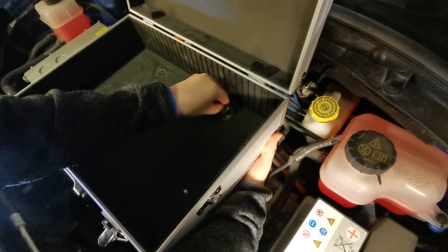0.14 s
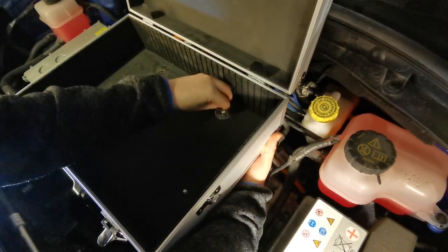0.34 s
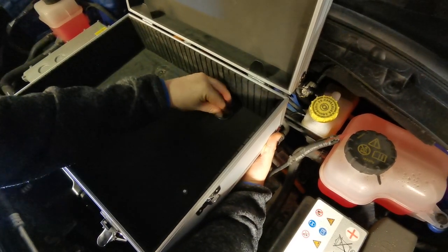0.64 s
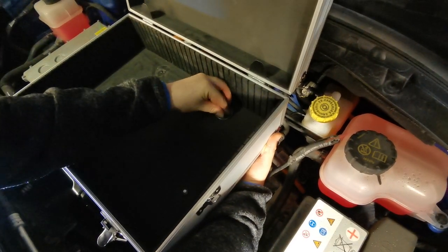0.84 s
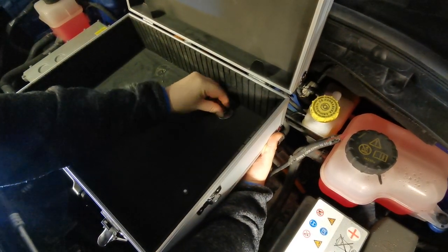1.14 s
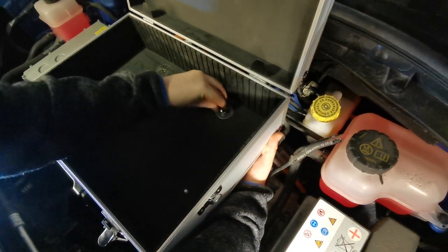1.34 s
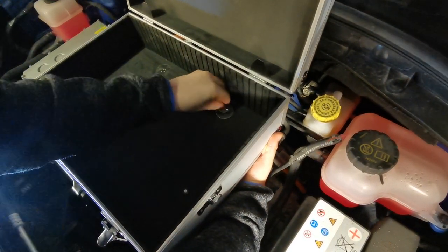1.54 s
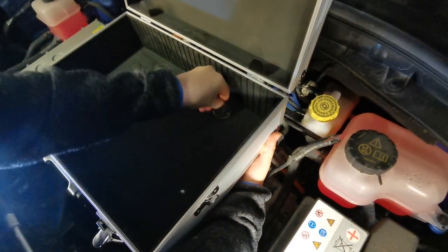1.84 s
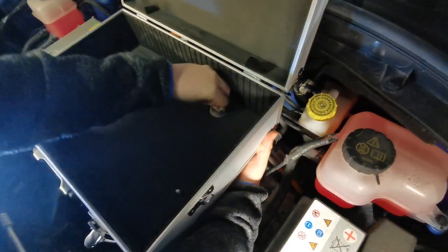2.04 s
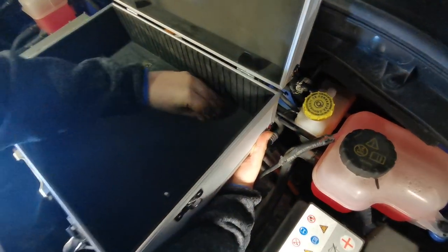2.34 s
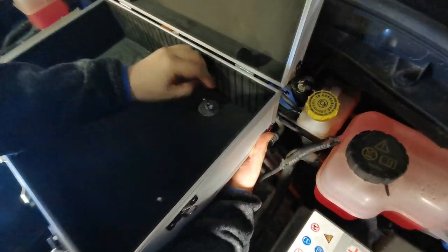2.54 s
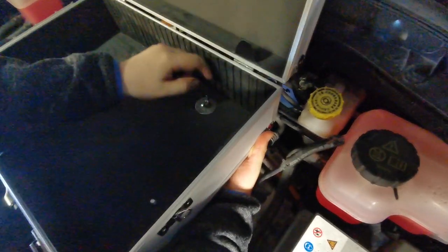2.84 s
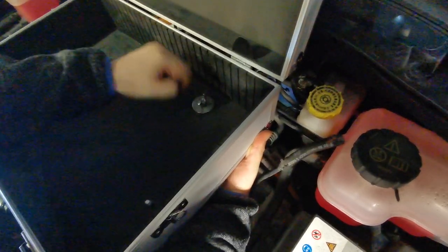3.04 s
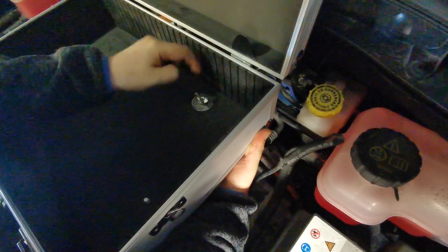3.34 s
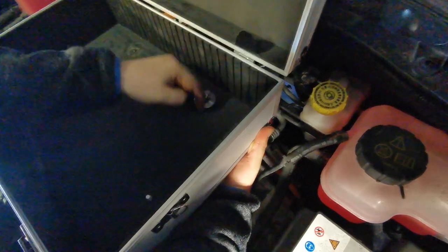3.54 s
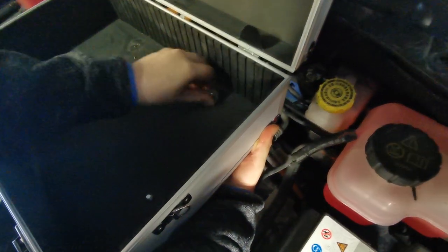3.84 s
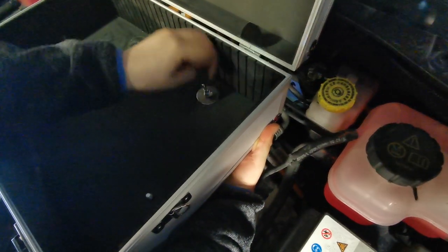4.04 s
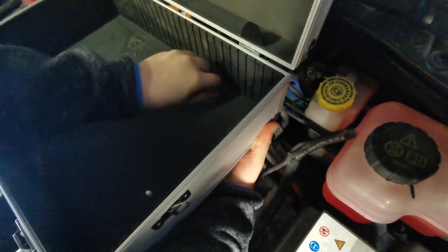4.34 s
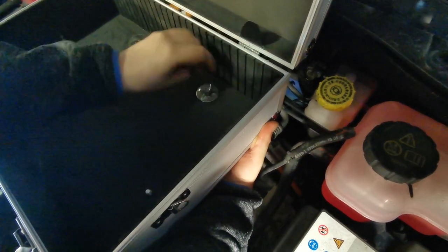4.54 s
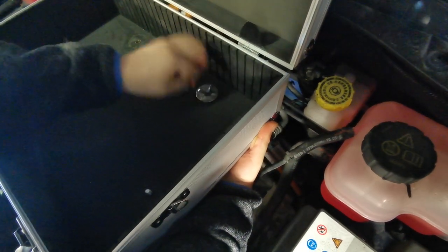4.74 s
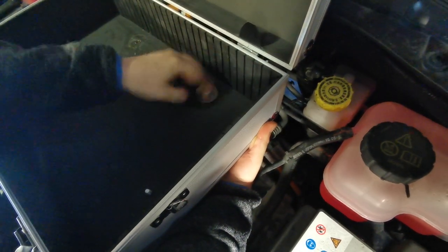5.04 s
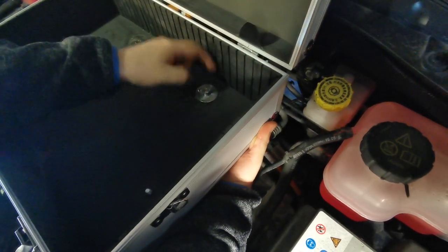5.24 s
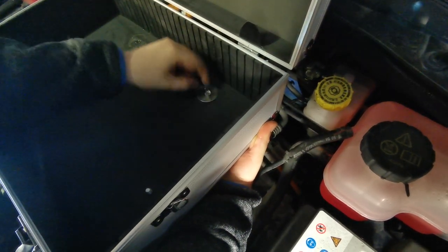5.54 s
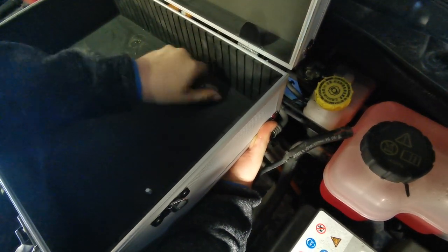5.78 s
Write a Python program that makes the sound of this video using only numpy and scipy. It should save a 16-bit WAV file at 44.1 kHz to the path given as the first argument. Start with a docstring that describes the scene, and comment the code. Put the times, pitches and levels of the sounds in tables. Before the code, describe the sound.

Close, quiet stereo sound of a wing nut being spun by hand onto a loose bolt in a metal-framed case in an engine bay. A clack at 0.0 s and a lighter one at 0.2 s ring briefly, then only faint scraping, a very weak squeak and skin slips remain over a low, wavering hum. The hum sinks around 1.4 s, returns weakly near 1.9 s and fades. A clack with a scrape comes at 1.3 s, and the loudest double clack at 1.8 s. Small ticks follow at 2.4 s, a boomy knock and scrape at 2.8 s, and strong pinging clacks at 3.3-3.4 s. From 3.6 to 4.5 s there are scrapes, grainy finger slips and sleeve rustle. A ringing flick at 4.8 s leads to bright, scraping clacks around 5.2 and 5.4 s, then soft sleeve brushing over low rumble.

```python
"""A wing nut is spun by hand onto a bolt through the floor of a metal-framed case in an engine bay.
The loose bolt clacks in its hole and its thread scrapes: blows and trains of tiny blows on ringing modes.
Fingers knock the case and flick the nut so that it pings; the spinning thread squeaks faintly as a friction
tone, and skin slips over the wings as grainy noise.
A low, wavering sine hums and falls away unevenly over a quiet background of coloured noise."""
import sys
import numpy as np
from scipy import signal
from scipy.fft import rfft, irfft, next_fast_len
from scipy.io import wavfile
from scipy.ndimage import uniform_filter1d

SR = 44100
rng = np.random.default_rng(int(sys.argv[2]) if len(sys.argv) > 2 else 0)


def to_wav(sig):
    """Store sig (one row per channel, or 1-D mono) as 16-bit WAV at the path in sys.argv[1].

    Samples outside -1..1 are clipped; the rate is SR.
    """
    pcm = np.clip(np.atleast_2d(sig), -1, 1) * 32767
    pcm = np.round(pcm).astype(np.int16)
    wavfile.write(sys.argv[1], SR, pcm.T)  # frames by channels


N = 260710
TIME = np.arange(N) / SR
AGE = TIME[:int(0.4 * SR)]   # time since a blow, s
BAND_HZ = np.geomspace(25, 16000, 33)   # centres of the noise bands

# Levels in the tables are relative, ahead of the gains in the functions and the mix.
# Colours are relative spectral densities, scaled to a total power of 1 before use.


def from_db(db):
    """Logarithmic level: 20 dB is a tenfold amplitude."""
    return 10 ** (np.asarray(db) / 20)


def at_hz(table, hz, axis=1):
    """Logarithmic frequency scale: a table column is interpolated along it."""
    table = np.array(table)
    return np.interp(np.log(hz), np.log(table[:, 0]), table[:, axis])


def level(curve):
    """Amplitude envelope: gain follows straight lines in dB between rows of (t/s, level/dB)."""
    return from_db(np.interp(TIME, *np.transpose(curve)))


def dying(t60):
    """Exponential damping: each row falls by 60 dB in its t60."""
    return np.exp(-np.log(1000) * AGE / np.reshape(t60, (-1, 1)))


def panned(pan_db):
    """Constant-power panning: a level difference splits into left and right gains."""
    gains = from_db(np.array([pan_db, -pan_db]) / 2)
    return gains / np.sqrt(np.mean(gains ** 2, axis=0))


def add(out, s, sound):
    """Superposition: a sound is summed in from its starting time."""
    start = int(s * SR)
    out[:, start:start + sound.shape[1]] += sound[:, :N - start]


# two microphone ports: f/Hz, left-right level/dB, likeness (0-1), left lead/rad
PORT_RESPONSE = [(39.8, 2, 1, -1.5), (109, 4.5, 1, 0), (280, 1.5, 0.99, 0.84), (470, 2, 1, 0.95),
                 (720, -3.5, 0.56, 1), (1090, -1, 0.99, 1.5), (1500, -2.5, 0, 1.5), (2530, -9, 0, 6),
                 (3090, 2.5, 0.58, 6), (4900, -1, 0.06, -4), (8000, -1.5, 0.63, -58),
                 (11100, -7.5, 0.08, 8.5)]


def noise_bands():
    """Coherence and phase between two ports: stereo noise in narrow bands of rms 1, band x channel x time."""
    size = next_fast_len(N)
    hz = np.maximum(np.arange(size // 2 + 1) * SR / size, 1)
    left, other = rfft(rng.standard_normal((2, size)))
    alike = at_hz(PORT_RESPONSE, hz, axis=2)
    delayed = left * np.exp(-1j * at_hz(PORT_RESPONSE, hz, axis=3))
    right = alike * delayed + np.sqrt(1 - alike ** 2) * other
    pair = (np.array([left, right]) * panned(at_hz(PORT_RESPONSE, hz))).astype(np.complex64)
    band_ratio = BAND_HZ[1] / BAND_HZ[0]
    nearest = np.round(np.log(hz / BAND_HZ[0]) / np.log(band_ratio))
    bands = [irfft(pair * (nearest == k))[:, :N] for k in range(len(BAND_HZ))]
    return np.array([band / band.std() for band in bands])


def band_gains(colour):
    """Band power is density times bandwidth: a colour becomes band gains of total power 1."""
    gains = from_db(at_hz(colour, BAND_HZ)) * np.sqrt(BAND_HZ)   # bandwidth grows with frequency
    return gains / np.linalg.norm(gains)


def steady(bands, colour):
    """Spectral shaping: weighted noise bands sum to stationary coloured noise."""
    return np.tensordot(band_gains(colour).astype(np.float32), bands, 1)


def swells(rest_db, moves):
    """Powers of independent sources add: a resting level gains one smooth swell for each movement."""
    power = from_db(rest_db) ** 2
    for s, length, db in moves:
        swell = np.sin(np.pi * np.clip((TIME - s) / length, 0, 1))
        power = power + (from_db(db) * swell) ** 2
    return np.sqrt(power)


# level of the hum: t/s, level/dB
HUM_LEVEL = [(0, -40.5), (.35, -40), (.47, -46.5), (1.17, -45.5), (1.43, -69), (1.86, -51), (2.1, -62),
             (5.9, -64)]


def hum(centre_hz=57.4, waver_hz=1.59):
    """Frequency modulation: phase sums a slightly wavering pitch into a low hum."""
    waver = np.interp(TIME, np.linspace(0, TIME[-1], num=40), rng.standard_normal(size=40))
    phase = 2 * np.pi * np.cumsum(centre_hz + waver_hz * waver) / SR
    return panned(3.2)[:, None] * level(HUM_LEVEL) * np.sqrt(2) * np.sin(phase)


# colours of distant air, sleeve and shifting case: f/Hz, spectral density/dB
AIR_SPECTRUM = [(25, -14), (42, -2), (59, -2.5), (87, -33), (236, -30.5), (326, -29.5), (754, -27),
                (1230, -35), (2220, -34.5), (3250, -44.5), (7000, -51), (16000, -97)]
SLEEVE_SPECTRUM = [(60, -49), (900, 12.5), (2200, 1.5), (3200, -1.5), (5000, 6.5), (9000, 1.5),
                   (15500, 4.5)]
RUMBLE_SPECTRUM = [(25, -9), (60, -12), (88, 3.5), (130, -9), (240, -14.5), (340, -31), (470, -30.5),
                   (900, -33.5), (3000, -106)]
# the sleeve brushes when the arm moves: t/s, length/s, level/dB
SLEEVE_BRUSHES = [(1.38, 0.27, -65.5), (3.147, 0.62, -66.5), (3.892, .3, -59), (4.155, 0.36, -67),
                  (4.6, 0.24, -65.5), (5.646, 0.16, -57.5), (5.763, 0.27, -60.5)]
# the hands lean on the case and it rumbles: t/s, length/s, level/dB
CASE_PUSHES = [(0.84, 0.13, -46.5), (3.873, .4, -47.5), (4.973, 0.17, -46.5), (5.417, 0.27, -45.5),
               (5.66, 0.25, -47.5)]


def background(bands, air_db=-50, air_fade_db_per_s=1.1, sleeve_rest_db=-72.5, rumble_rest_db=-53.5):
    """Broadband noise: sinking distant air, the sleeve's brush and the case shifting under the hands."""
    air = from_db(air_db - air_fade_db_per_s * TIME) * steady(bands, AIR_SPECTRUM)
    # time runs backwards here so that these layers do not copy the air
    sleeve = swells(sleeve_rest_db, SLEEVE_BRUSHES) * steady(bands, SLEEVE_SPECTRUM)[:, ::-1]
    rumble = swells(rumble_rest_db, CASE_PUSHES) * steady(bands, RUMBLE_SPECTRUM)[:, ::-1]
    return air + sleeve + rumble


# faint tail under the bonnet: f/Hz, t60/s
BONNET_TAIL = [(100, 0.82), (800, 0.39), (2200, 0.4), (6000, 0.15), (14000, 0.24)]


def dense_ring(bands, gains, t60, build_s, tail_db):
    """High modal density: overlapping modes act as decaying noise; the space under the bonnet adds a tail."""
    start = rng.integers(N - len(AGE))
    decay = dying(t60) + from_db(tail_db) * dying(at_hz(BONNET_TAIL, BAND_HZ))
    envelope = decay * (1 - np.exp(-AGE / build_s))
    weights = (gains[:, None] * envelope).astype(np.float32)
    return np.einsum("bt,bct->ct", weights, bands[:, :, start:start + len(AGE)])


# clear modes of the case: f/Hz, level/dB, t60/s
CLEAR_MODES = [(85.6, 10, 0.18), (109.4, -5, 0.29), (180.7, -10, 0.33), (218.8, -7, 0.25),
               (274.5, -9.5, 0.23), (413.7, -6.5, 0.22), (474.7, -4, 0.17), (629, -3, 0.17),
               (660.4, -2.5, 0.18), (728, 0, 0.17), (931.4, 5, 0.06), (1113.6, -8, 0.15), (1450, -33, 0.27),
               (1693, 4.5, 0.048), (2016, -8, 0.18), (2182, 7, 0.027), (2444, -7.5, 0.12)]


def case_ring(contact, scatter_db=1.5, build_cycles=1.0):
    """Modal superposition: the contact weights damped sines; low modes take longer to get going."""
    hz, db, t60 = np.transpose(CLEAR_MODES)
    scattered = from_db(db + scatter_db * rng.standard_normal(len(hz)))
    gains = scattered * contact(hz) * (-1) ** np.arange(len(hz))   # neighbours in opposite phase
    cycles = (hz[:, None] * AGE).astype(np.float32)
    lag = at_hz(PORT_RESPONSE, hz, axis=3)[:, None].astype(np.float32)
    waves = np.sin([2 * np.pi * cycles, 2 * np.pi * cycles - lag])
    envelope = dying(t60) * (1 - np.exp(-cycles / build_cycles))
    return np.einsum("cm,mt,cmt->ct", gains * panned(at_hz(PORT_RESPONSE, hz)), envelope, waves)


# dense ring of the case at its full length: f/Hz, t60/s
DENSE_DECAY = [(100, 0.029), (600, 0.11), (2000, 0.092), (5000, 0.033), (14000, 0.041)]


def bolt_blow(bands, colour, bass_db, bright_db, ring, build_s, modes_db, hard_hz):
    """Hard impact: a short, light blow of metal on metal favours the upper modes."""
    def lean(hz):
        return from_db(at_hz([(400, bass_db), (1500, 0), (6000, bright_db)], hz))

    def contact(hz):
        return lean(hz) * hz / np.hypot(hz, hard_hz)   # weak below hard_hz
    gains = band_gains(colour) * lean(BAND_HZ)
    dense = dense_ring(bands, gains, ring * at_hz(DENSE_DECAY, BAND_HZ), build_s, tail_db=-24.0)
    return dense + from_db(modes_db) * case_ring(contact)


# bolt clacking in its hole: t/s, level/dB, brightness/dB, build-up time constant/s
BOLT_CLACKS = [(0.0159, -17.5, 1, .0018), (0.176, -25.5, 5.5, 0.00039), (1.246, -31.5, -12, 0.0012),
               (1.282, -17, -5, 0.0032), (1.541, -46.5, 11.5, .0017), (1.556, -32.5, -22, 0.001),
               (1.619, -38, 3.5, 0.00046), (1.648, -41.5, -5, 0.0011), (1.7892, -9.5, -4.5, 0.0023),
               (1.8459, -11, -0.5, 0.0026), (2.371, -27, -4, 0.0037), (2.453, -38.5, -12, 0.0015),
               (2.467, -29.5, 4, 0.0049), (2.482, -30.5, 0, 0.00078), (2.846, -20, 1, 0.0055),
               (3.338, -19, -14, .004), (3.406, -12.5, -3.5, .0016), (3.411, -20.5, 5, .0022),
               (3.656, -29, -28, 0.0019), (4.002, -27, -11, 0.001), (4.014, -31, 0, 0.0011),
               (4.069, -25.5, 1, 0.0023), (4.348, -39.5, -1.5, 0.00077), (4.396, -44.5, -8, .002),
               (4.504, -38, -2, 0.0012), (4.519, -18.5, -5, 0.011), (5.1705, -23, 6.5, 0.0017),
               (5.188, -15.5, 10, 0.014), (5.239, -21, -15, 0.008), (5.432, -27, 12, 0.006)]
# colour of a clack: f/Hz, spectral density/dB
CLACK_SPECTRUM = [(60, -32), (130, -5), (220, -2), (340, -37), (650, 3.5), (1000, -7.5), (1350, -3),
                  (1650, -9), (2250, -5.5), (2700, -20.5), (3400, -15), (4500, -5), (7000, -12),
                  (9000, -21), (15500, -38.5)]


def clacks(bands, even_db=-23.5, thinning=0.58, ring=0.7):
    """Contact time sets the spectrum: as the bolt tips onto its hole's edge, harder blows have thinner bass."""
    out = np.zeros((2, N))
    for s, db, bright_db, build_s in BOLT_CLACKS:
        bass_db = thinning * (even_db - db)   # dB of bass lost per dB above the even level
        blow = bolt_blow(bands, CLACK_SPECTRUM, bass_db, bright_db, ring, build_s, modes_db=-15, hard_hz=1110)
        add(out, s, from_db(db) * blow)
    return out


# fingers knocking on nut and case: t/s, level/dB, contact cut-off f/Hz, floor boom level/dB
FINGER_KNOCKS = [(0.016, -29, 230, -7.5), (0.178, -35, 237, 0.5), (1.005, -49, 1240, 0),
                 (1.271, -45, 900, -1.5), (1.79, -26, 280, -7.5), (1.846, -31.5, 300, -11),
                 (2.586, -44, 434, -12), (2.799, -26.5, 223, 0), (3.104, -36.5, 448, 4),
                 (3.149, -32.5, 684, -6), (3.337, -17.5, 617, -4), (3.408, -19.5, 547, -27),
                 (3.527, -44, 700, -19), (3.619, -43.5, 750, 5), (4.104, -39, 416, -8),
                 (4.228, -39.5, 467, 3), (4.261, -45.5, 317, 9), (4.809, -29, 765, 7),
                 (4.856, -42.5, 600, 1), (5.249, -35.5, 1200, -13), (5.433, -32.5, 690, 4)]
# colour of a knock: f/Hz, spectral density/dB
KNOCK_SPECTRUM = [(50, -5), (100, 7), (310, -8), (450, -5.5), (1200, -5.5), (2000, -16), (5000, -26),
                  (15000, -13)]


def knocks(bands, dense_db=-3, modes_db=-4.5):
    """Soft contact is a low-pass: a fingertip drives mainly the low modes, and the floor booms by its own level."""
    out = np.zeros((2, N))
    for s, db, cut_hz, boom_db in FINGER_KNOCKS:
        def contact(hz):
            boom = from_db(at_hz([(110, boom_db), (200, 0)], hz))
            return boom / np.hypot(1, (hz / cut_hz) ** 2)
        gains = band_gains(KNOCK_SPECTRUM) * contact(BAND_HZ)
        dense = dense_ring(bands, gains, at_hz(DENSE_DECAY, BAND_HZ), build_s=0.00079, tail_db=-9.0)
        add(out, s, from_db(db) * (from_db(dense_db) * dense + from_db(modes_db) * case_ring(contact)))
    return out


def stroke(length, swell_share, taper=1.7):
    """Contact pressure: it rises linearly over a share of the stroke and tapers off by a power law."""
    t, top = TIME[:int(length * SR) + 2], length * swell_share
    return np.minimum(t / top, np.interp(t, [top, length], [1, 0]) ** taper)


# thread scraping as the nut spins: t/s, level/dB, length/s, brightness/dB
THREAD_SCRAPES = [(0.402, -52.5, 0.15, -10), (0.618, -57.5, 0.36, -27), (1.283, -43.5, 0.12, -19),
                  (1.545, -54, 0.21, -40), (2.295, -54.5, 0.12, -6), (2.356, -50.5, 0.12, -3.5),
                  (2.831, -33.5, 0.1, -2.5), (3.643, -39.5, 0.16, -7.5), (3.985, -42.5, 0.1, -38),
                  (4.059, -37.5, 0.034, -1), (4.434, -51.5, .11, -18), (4.504, -37, 0.089, -1),
                  (4.563, -50.5, 0.12, -7), (5.169, -31, 0.076, 6.5), (5.217, -33, .07, -4),
                  (5.442, -44.5, .1, -8.5)]
# colour of a scrape: f/Hz, spectral density/dB
SCRAPE_SPECTRUM = [(60, 6), (220, -2.5), (340, -9.5), (650, 4.5), (1000, -0.5), (1350, -5.5), (2250, -3),
                   (2700, -12), (3400, -11), (4500, -2.5), (5800, -9), (7500, -13.5), (9500, -23.5),
                   (15500, -37)]


def scrapes(bands, catches_per_s=520, spread_db=4, bass_db=0.0):
    """Stick-slip: the thread catches and lets go hundreds of times a second, each catch a tiny blow."""
    out = np.zeros((2, N))
    for s, db, length, bright_db in THREAD_SCRAPES:
        pressure = stroke(length, swell_share=0.22, taper=2.26)
        chance, size = rng.random(len(AGE)), rng.standard_normal((2, len(AGE)))
        catches = (chance < catches_per_s / SR) * np.sign(size[0]) * from_db(spread_db * size[1])
        force = pressure * np.resize(catches, len(pressure))
        blow = bolt_blow(bands, SCRAPE_SPECTRUM, bass_db, bright_db, ring=1.0, build_s=0.00088,
                         modes_db=-12.5, hard_hz=700)
        sound = signal.fftconvolve(blow, force[None])
        # the energy matches that of the pressure curve in both channels
        even = np.sqrt(2 * np.sum(pressure ** 2) / (np.sum(sound ** 2) + 1e-18))
        add(out, s, from_db(db) * sound * even)
    return out


# thread squeaking as the nut spins: top speed t/s, coasting time/s, top pitch f/Hz, level/dB
NUT_SPINS = [(.76, .26, 779, -62.5), (1.12, 0.092, 9100, -81), (4.71, 0.41, 7250, -71.5),
             (5.04, 0.12, 7030, -75)]


def squeak(run_up_s=0.12, sag=0.14, jitter_hz=45, flutter=1.0):
    """Friction oscillation: a thin tone's pitch and level follow the nut's speed as it runs up and coasts."""
    jitter = uniform_filter1d(rng.standard_normal((2, N)), size=60)
    grip = uniform_filter1d(rng.standard_normal((2, N)), size=700)
    out = np.zeros((2, N))
    for s, coast_s, top_hz, db in NUT_SPINS:
        speed = np.maximum(1 - ((TIME - s) / np.where(TIME < s, run_up_s, coast_s)) ** 2, 0)
        steady_pitch = top_hz * (1 - sag * (1 - speed))   # sag: share of the pitch lost at rest
        pitch = steady_pitch + jitter_hz * jitter / jitter.std()
        out += from_db(db) * np.sqrt(speed) * np.sin(2 * np.pi * np.cumsum(pitch, axis=1) / SR)
    return out * (1 + flutter * grip / grip.std())


# skin slipping over the wings: t/s, level/dB, length/s, lower edge of the hiss f/Hz
SKIN_SLIPS = [(0.880, -69, .04, 8000), (0.93, -64, 0.04, 8000), (0.958, -54.5, 0.054, 9300),
              (1.395, -47, 0.13, 3320), (1.534, -61, 0.042, 8000), (2.092, -49.5, 0.069, 15000),
              (2.578, -57.5, .033, 13000), (3.111, -49, 0.05, 9950), (3.269, -45.5, 0.023, 4900),
              (4.096, -42.5, 0.036, 5400), (4.127, -43, 0.067, 4960), (4.227, -47, 0.022, 5400),
              (4.270, -38.5, 0.041, 5600), (4.823, -45.5, 0.041, 4000), (4.976, -50.5, 0.021, 4740),
              (5.007, -48, .016, 5530)]
# colour of a slip: f/Hz, spectral density/dB
SLIP_SPECTRUM = [(60, -45.5), (2200, -6), (3400, -7.5), (4800, -0.5), (6000, -3.5), (7400, -3.5),
                 (9500, -6.5), (11000, -5.5), (13500, -3.5), (16000, -7.5)]


def slips(bands, grain_db=2.0):
    """Friction noise: ridges of skin on metal make a finely grained hiss, thinner where its edge is higher."""
    out = np.zeros((2, N))
    for s, db, length, edge_hz in SKIN_SLIPS:
        pressure = stroke(length, swell_share=0.39)
        gains = band_gains(SLIP_SPECTRUM) / np.hypot(1, (edge_hz / BAND_HZ) ** 3)
        start = int(s * SR)
        hiss = np.tensordot(gains / np.linalg.norm(gains), bands[:, :, start:start + len(pressure)], 1)
        add(out, s, from_db(db) * pressure * hiss)
    grain = uniform_filter1d(rng.standard_normal(N), size=60)
    return out * from_db(grain_db * grain / grain.std())


# light flicks of the nut: t/s, tick level/dB, ping level/dB
NUT_FLICKS = [(1.284, -53, -65), (1.377, -64, -82), (1.79, -32, -52), (1.818, -59, -75),
              (2.801, -47.5, -66), (3.108, -50, -71), (3.338, -36.5, -45.5), (3.352, -38.5, -65),
              (3.379, -60, -73), (3.415, -39, -59.5), (3.463, -49.5, -77), (4.103, -63, -57.5),
              (4.81, -43.5, -54), (4.84, -44, -52), (4.98, -50.5, -76), (5.011, -61, -70),
              (5.24, -46, -53.5)]
# modes of the nut: f/Hz, level/dB, t60/s, left-right level/dB
PING_MODES = [(4790, -0.5, 0.048, 3), (7160, 12.5, 0.059, 8), (7400, -23, 0.025, 12),
              (10200, 2, 0.084, -11), (10900, -30, 0.036, -21.5), (13500, -26, 0.058, -5)]
# colour of a tick: f/Hz, spectral density/dB
TICK_SPECTRUM = [(60, -47), (2200, 3), (3400, -4), (4800, 8.5), (6000, 9), (7400, 10.5), (9500, -3),
                 (11000, 6), (13500, -1), (16000, -9)]


def flicks(bands, tick_t60=0.014, tick_gain_db=4.0, ping_gain_db=-2):
    """Free vibration: a nail ticks on a wing, and the nut's modes ring when the fingers leave it free."""
    out = np.zeros((2, N))
    hz, db, t60, pan_db = np.transpose(PING_MODES)
    for s, tick_db, ping_db in NUT_FLICKS:
        tick = dense_ring(bands, band_gains(TICK_SPECTRUM), tick_t60, build_s=0.00067, tail_db=-19)
        seating = 1 + 0.0043 * rng.standard_normal(len(hz))   # pitch shifts with the nut's seat on the thread
        modes = dying(t60) * np.sin(2 * np.pi * (hz * seating)[:, None] * AGE)
        ping = (panned(pan_db) * from_db(db + rng.normal(0, 0.59, len(hz)))) @ modes
        add(out, s, from_db(tick_db + tick_gain_db) * tick + from_db(ping_db + ping_gain_db) * ping)
    return out


def scene():
    """Linear superposition: bolt, fingers and nut over hum and background."""
    bands = noise_bands()
    bolt = from_db(-6.0) * clacks(bands) + from_db(2.0) * scrapes(bands) + squeak()
    fingers = knocks(bands) + from_db(3.0) * flicks(bands) + slips(bands)
    return bolt + fingers + from_db(1.5) * hum() + background(noise_bands())


def record(dry, low_cut_hz=33, top_cut_hz=16000):
    """Band limiting: the microphone drops the deepest bass, and the top is cut steeply."""
    without_bass = signal.sosfilt(signal.butter(2, low_cut_hz, "high", fs=SR, output="sos"), dry)
    return signal.sosfilt(signal.ellip(10, .2, 80, top_cut_hz, fs=SR, output="sos"), without_bass)


dry = scene()
out = record(dry)
to_wav(out)
```